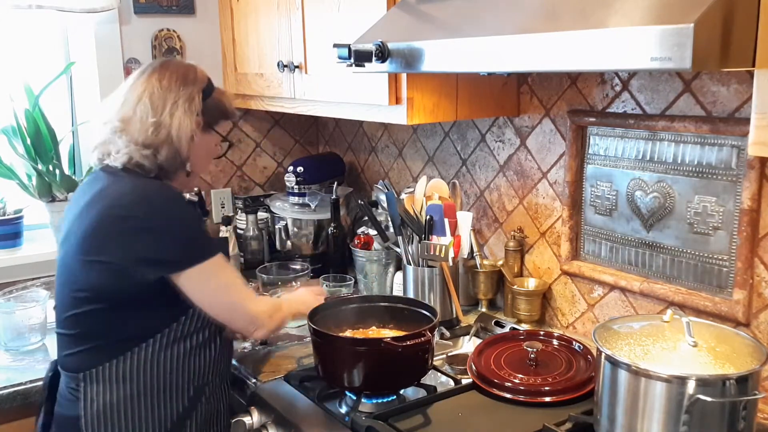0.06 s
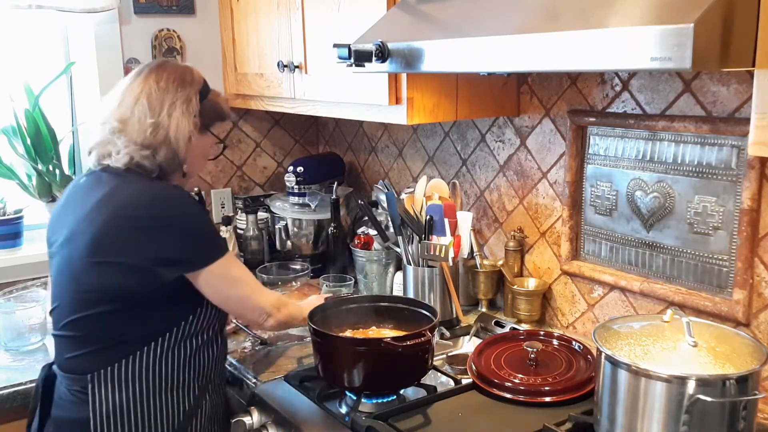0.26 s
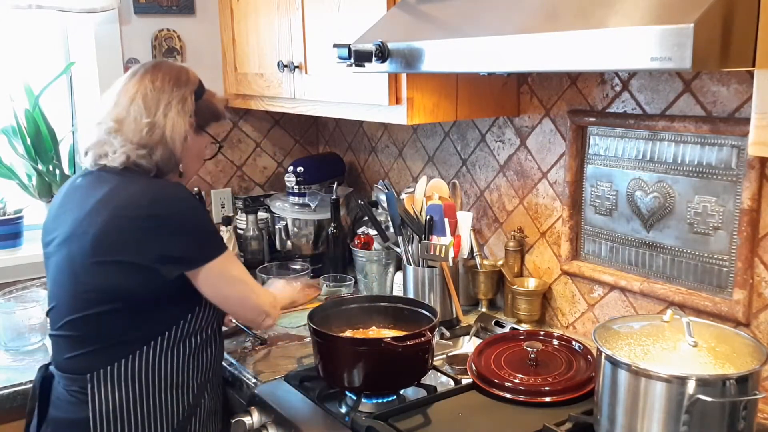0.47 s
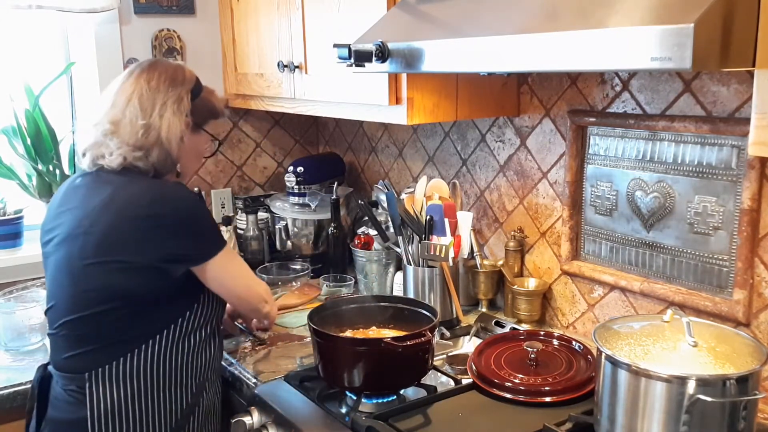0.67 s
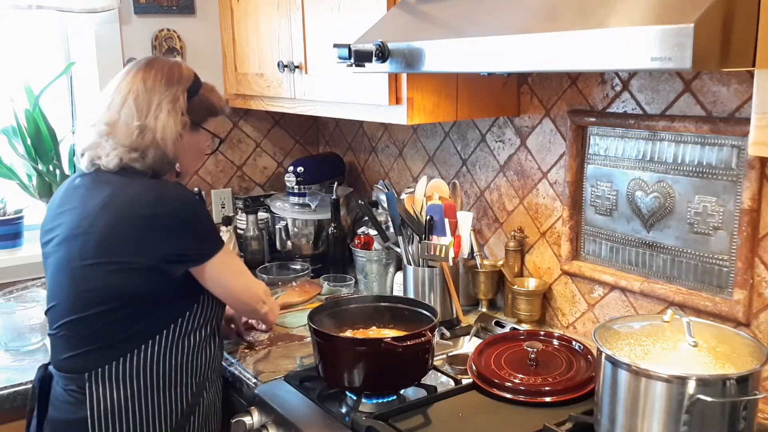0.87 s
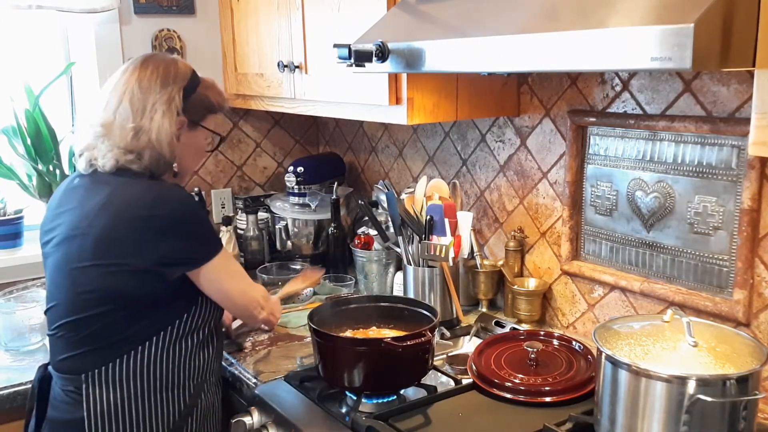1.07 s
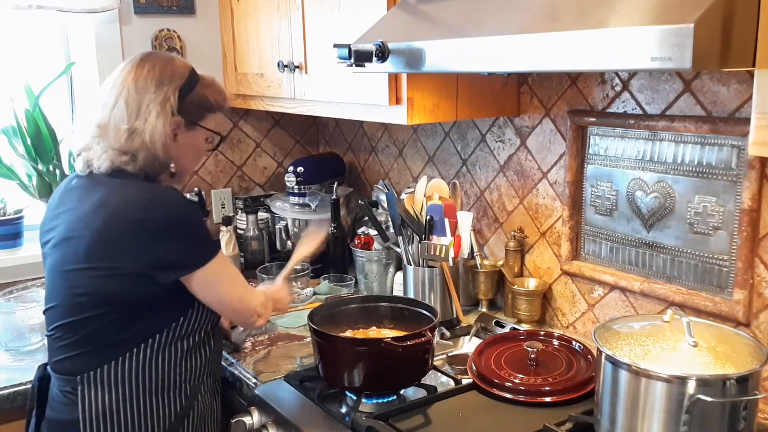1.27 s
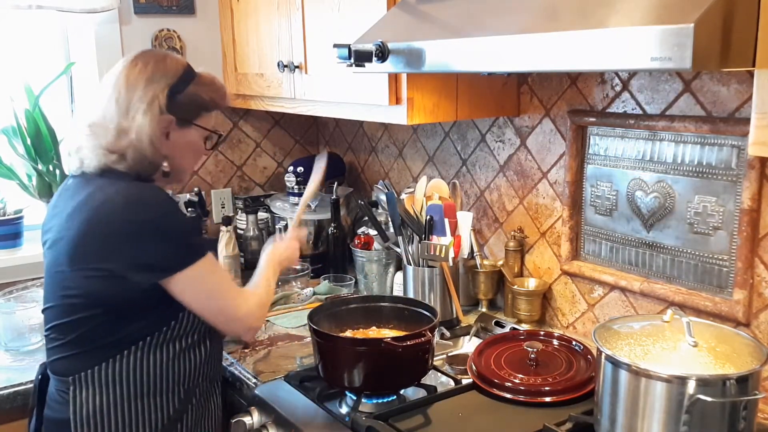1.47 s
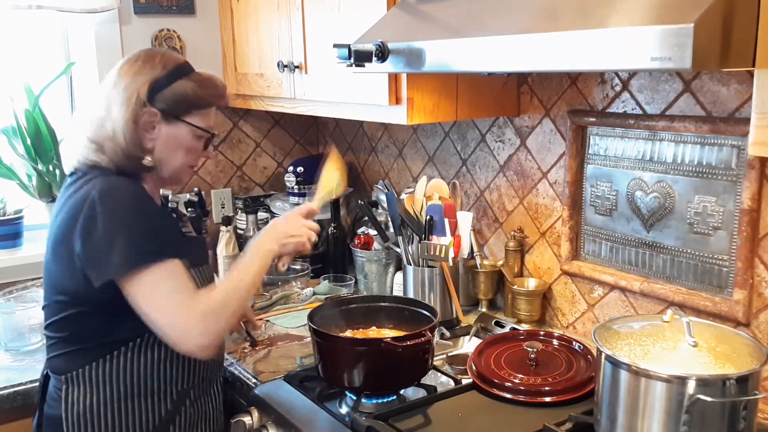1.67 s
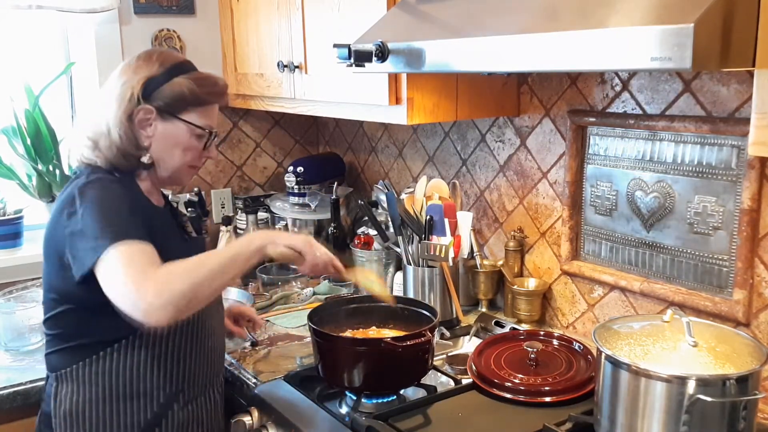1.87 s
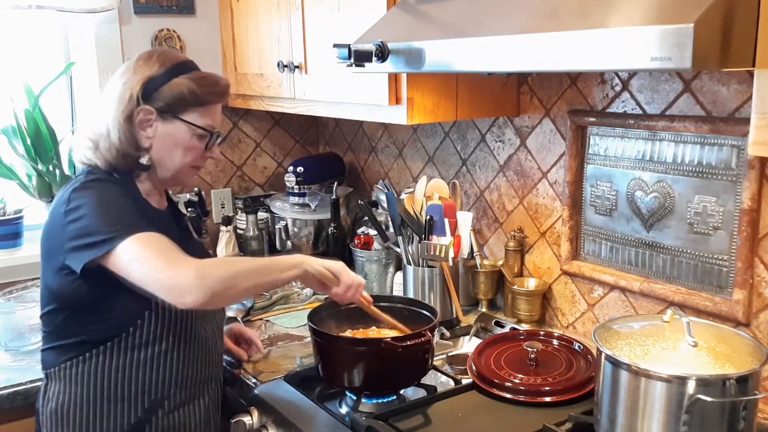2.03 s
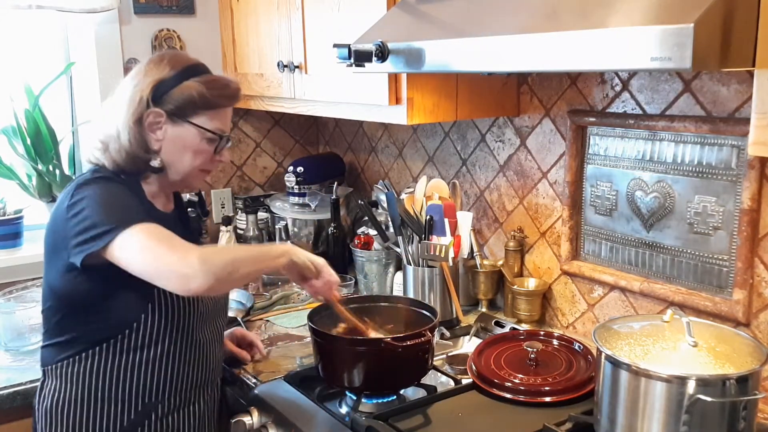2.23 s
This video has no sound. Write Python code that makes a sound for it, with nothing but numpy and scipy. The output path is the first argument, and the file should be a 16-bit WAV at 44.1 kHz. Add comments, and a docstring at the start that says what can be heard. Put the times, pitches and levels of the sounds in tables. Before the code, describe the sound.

Wooden spoon knocking down, rasping three times and bumping in a pot of simmering sauce.

```python
"""A wooden spoon is knocked down beside a pot of sauce, bounces, and scrapes three times on a hard surface,
sticking and slipping so that it rasps and squeaks. Then it dips into the cast-iron pot and bumps about,
muffled by the sauce. The simmering sauce spits faintly. A tiled kitchen echoes around it all,
over the hum of the mains and the hiss of the stove."""
import sys
import numpy as np
from scipy import signal
from scipy.fft import rfft, irfft
from scipy.io import wavfile
from scipy.ndimage import uniform_filter1d

SR = 44100
rng = np.random.default_rng(int(sys.argv[2]) if len(sys.argv) > 2 else 0)


def wav_record(signal):
    """Record a signal, one row per channel, as 16-bit PCM in the file named by sys.argv[1]."""
    frames = np.transpose(np.atleast_2d(signal))
    bounded = np.clip(frames, -1, 1)
    # unit amplitude maps onto the largest positive 16-bit level
    quanta = np.round(bounded * 32767).astype(np.int16)
    wavfile.write(sys.argv[1], SR, quanta)


N = 101429

# Levels in the tables are relative. A fade time (T60) is how long a sound takes to drop by 60 dB.
# The spoon lands, chatters and bounces. Each row: start in seconds, level in dB, treble boost in dB.
KNOCK_HITS = [(0.2021, -0.5, 3.5), (0.2128, 0, -4), (0.2193, -3, -1.5), (0.2250, -2.5, -0.5),
              (0.2440, -5, -5), (0.3000, -14.5, 3), (0.324, -6, 4), (0.3289, -8.5, -1), (0.3405, -11, -10)]
# The tone of each hit. Each row: frequency in Hz, level in dB.
KNOCK_TONE = [(50, -24), (120, -9.5), (180, -13.5), (270, -12), (400, -11.5), (650, -1.5), (1100, -7),
              (1600, 0.5), (2100, 3), (2700, -3.5), (3200, -7.5), (4000, -5.5), (5400, -15.5), (7000, -26),
              (8000, -41), (15000, -41.5)]
# The struck surface rings. Each row: pitch in Hz, level in dB, fade time in seconds.
SURFACE_NOTES = [(281, -12, .3), (585, -8, .33), (846, -10, .25), (1345, -4, .32), (1698, -5, .35),
                 (2002, -2, .36), (2063, -8, .35), (2096, -7, .3), (2360, -5, .35), (2405, -5, .36),
                 (2862, -5, .38), (2911, -3, .42), (3525, -11, .34), (3624, -10, .36)]
# The worktop thuds. Each row: pitch in Hz, level in dB, fade time in seconds.
THUD_NOTES = [(78.2, -5.5, .25), (110.4, -7, 0.2), (171.5, -0.5, 0.28)]
KNOCK_DB, CLATTER_DB, CLATTER_T60_S, CRACK_T60_S = -7.5, -1, 0.038, 0.0045
RING_DB, THUD_DB, RING_BUILD_S = -3, -19, .01

# Three scrapes, one list each. Each row: time in seconds, rubbing level in dB, treble in dB, ring in dB.
STROKES = [
    [(0.675, -19, -20, 14), (0.698, -2.5, -9, 5), (0.748, -0.5, -11, 4), (0.765, 3, 10, 3.5),
     (0.805, 3, -16, 1), (0.835, -7.5, -9, 1), (0.87, -14, -31, -12), (0.96, -21.5, 3, 11)],
    [(0.971, -3, -13, -12), (0.975, -2.5, 5, 0), (1.003, -5.5, -2.5, -4), (1.025, -5, -8, 6),
     (1.044, -5, -21, -8), (1.066, -8.5, -2, 0), (1.075, 2, 8, 1), (1.089, -8, -1, -10), (1.096, 9, 5, 6.5),
     (1.118, -12, -26, -24), (1.16, -16, -17, 15)],
    [(1.29, -13, -1, -10), (1.322, -5, -5.5, 4), (1.342, -3, 5.5, -1), (1.455, -1.5, 6, 7),
     (1.48, 2.5, 6.5, 4), (1.54, -1.5, 4.5, 12.5), (1.575, 1.5, 1, 6.5), (1.635, -1.5, 3.5, 7),
     (1.655, -22, -17, 1), (1.72, -20, -12, -11)],
]
# The tone of the rasp, one list per scrape. Each row: frequency in Hz, level in dB.
STROKE_TONES = [
    [(71, -22), (120, -21.5), (288, -14), (390, -23.5), (719, -13.5), (1380, -8), (1530, -5.5),
     (1690, -8.5), (2110, -7.5), (4130, -14.5), (4960, -8), (8420, -17.5), (15500, -22.5)],
    [(71, -50), (120, -15), (288, -10.5), (407, -14), (1560, 0), (1720, 0), (2810, -1.5), (3890, -7),
     (4960, -2.5), (7610, -6), (8590, -21.5), (9320, -12), (15500, -17)],
    [(120, -18.5), (400, -23.5), (700, -15.5), (1100, -4.5), (1600, 0.5), (2200, -2), (2600, -4),
     (3900, -9), (4700, -5.5), (6900, -7), (8000, -16.5), (8700, -22), (10700, -18), (15500, -26)],
]
# Notes that the rubbing sets ringing. Each row: pitch in Hz, width in Hz, level in dB.
SCRAPE_RESONANCES = [(620, 70, -15), (1150, 40, -11), (1515, 35, -6), (1556, 28, 2), (1615, 35, -7),
                     (2035, 55, -8), (2145, 45, -4), (2230, 45, -9), (2900, 140, -12)]
# A thin squeak lingers from the first scrape into the second. Each row: time in seconds, level in dB.
SQUEAK_LEVELS = [(0.74, -42), (0.79, -5), (0.87, -24.5), (0.915, -15.5), (0.96, -33), (0.99, -8.5),
                 (1.05, -26), (1.072, -0.5), (1.1, -6.5), (1.13, -29), (1.18, -35)]
# The high notes of the squeak. Each row: pitch in Hz, width in Hz, level in dB.
SQUEAK_RESONANCES = [(4365, 70, -4), (4552, 45, 0), (4880, 110, -7), (5110, 90, -6)]
SCRAPE_DB, RESONANCE_DB, JUDDER_DB = -49.5, -11, 1.5
CLICKS_PER_S, CLICK_SPREAD_DB, TREBLE_HZ = 9000, 4, 3536

# The spoon bumps the pot.
# Each row: start in seconds, level in dB, seconds for the drag to drop 30 dB, brightness in dB.
POT_BUMPS = [(0.591, -12.5, 0.077, 3), (1.864, -3, 0.017, -46.5), (1.991, -6.5, .02, -13),
             (2.002, -3.5, 0.0074, -19), (2.098, 1.5, .02, 2), (2.14, -1, 0.0034, 4.5),
             (2.199, -7.5, 0.096, 4), (2.245, -2.5, 0.054, 10), (2.275, -4.5, 0.049, 9)]
# The low notes of the pot's body. Each row: pitch in Hz, width in Hz, level in dB.
POT_BODY = [(566, 100, -5.5), (645, 71, -1.5), (734, 140, -7.5)]
# The brighter notes of its wall. Each row: pitch in Hz, width in Hz, level in dB.
POT_WALL = [(1040, 64, 6), (1187, 56, 11), (1396, 750, 9.5), (2200, 170, -20.5), (2700, 120, -10.5),
            (4300, 1500, -25)]
BUMP_DB = -36.5

# The sauce spits. Each row: start in seconds, level in dB.
SPITS = [(0.0898, 2.5), (0.093, -7), (0.96, -2), (1.7605, -9.5), (1.814, -12.5), (1.822, -4), (1.823, -18)]
# The bright tone of a spit. Each row: frequency in Hz, level in dB.
SPIT_TONE = [(1000, -17.5), (5000, -11.5), (9000, -40), (11000, 3.5), (12300, 8.5), (13500, 0.5),
             (16000, -1.5)]
SPIT_DB, SPIT_T60_S, SPIT_ROOM_DB = -34.5, 0.0088, -12.5

# The stove's rumble and hiss. Each row: frequency in Hz, level in dB.
STOVE_TONE = [(20, -34.5), (35, -19), (60, -7.5), (90, -10.5), (170, -9.5), (240, -19), (300, -12),
              (450, -24), (600, -7.5), (800, -29), (1000, -24), (1600, -27), (2600, -32.5), (4000, -29),
              (5000, -25), (6500, -33.5), (7800, -34), (8800, -56), (10500, -34.5), (12300, -31.5),
              (15500, -30.5)]
# The mains and a fan hum. Each row: pitch in Hz, level in dB.
HUM_NOTES = [(60, -65.5), (120, -81), (175, -81.5), (291, -83)]
STOVE_DB, STOVE_WIDE_HZ, HUM_WAVER_DB = -69, 406, -3

# How long the kitchen echoes. Each row: frequency in Hz, fade time in seconds.
ROOM_FADES = [(150, .36), (600, .33), (2000, .34), (5000, .35), (12000, .34)]
ROOM_DB, ROOM_BUILD_S, ROOM_WIDE_HZ = 7, 0.0012, 720
ECHO_SPREAD_DB, ECHO_THICKEN_S = 3, 0.58
RIGHT_DELAY_S, PAN_DB, TOP_HZ = 3 / SR, -2.4, 15850


def spoon_knock():
    """Each time the spoon hits, it makes a sharp crack and a short woody clatter."""
    wood, out = tone_filter(KNOCK_TONE), np.zeros(N)
    for start, db, treble_db in KNOCK_HITS:
        push = puff(CRACK_T60_S) + undb(CLATTER_DB) * puff(CLATTER_T60_S)
        add(out, start, undb(db) * treble(convolve(push, wood), treble_db))
    return undb(KNOCK_DB) * out


def surface_ring():
    """The first hit leaves the surface ringing after the clatter, over a soft thud."""
    t, out = np.arange(N) / SR, np.zeros(N)
    ring = undb(RING_DB) * ringing_notes(SURFACE_NOTES) + undb(THUD_DB) * ringing_notes(THUD_NOTES)
    add(out, KNOCK_HITS[0][0], ring * (1 - np.exp(-t / RING_BUILD_S)))
    return out


def spoon_scrapes():
    """Rubbing makes a rasp, a ring and a thin squeak. Pressing harder makes them louder."""
    t, ring = np.arange(N) / SR, resonances(SCRAPE_RESONANCES)
    judder = undb(JUDDER_DB * wander(120))
    squeak_rub = stick_slip() * pressure(t, *np.array(SQUEAK_LEVELS).T)
    out = convolve(squeak_rub, resonances(SQUEAK_RESONANCES))
    for stroke, tone in zip(STROKES, STROKE_TONES):
        times, db, treble_db, ring_db = np.array(stroke).T
        rasp = convolve(stick_slip() * judder * pressure(t, times, db), tone_filter(tone))
        out += treble(rasp, np.interp(t, times, treble_db))
        ring_rub = stick_slip() * judder * pressure(t, times, db + ring_db + RESONANCE_DB)
        out += convolve(ring_rub, ring)
    return undb(SCRAPE_DB) * out


def stick_slip():
    """Sliding wood catches and lets go, making a stream of tiny, uneven clicks."""
    clicks = (rng.random(N) < CLICKS_PER_S / SR) * rng.choice([-1, 1], N)
    return unit(clicks * undb(CLICK_SPREAD_DB * rng.standard_normal(N)))


def pressure(t, times, db):
    """How hard the spoon presses: it glides between the levels and is zero before and after."""
    return undb(np.interp(t, times, db)) * (t > times[0]) * (t < times[-1])


def pot_bumps():
    """The spoon drags briefly on the iron, and the sauce cuts the ring short."""
    body, wall, out = resonances(POT_BODY), resonances(POT_WALL), np.zeros(N)
    for start, db, drag_s, bright_db in POT_BUMPS:
        drag = rng.standard_normal(N) * fade(2 * drag_s)
        pot = body + undb(bright_db) * wall
        add(out, start, undb(db) * unit_energy(convolve(drag, pot)))
    return undb(BUMP_DB) * out


def sauce_spits():
    """The simmering sauce spits in tiny bright ticks."""
    out = np.zeros(N)
    for start, db in SPITS:
        add(out, start, undb(db) * puff(SPIT_T60_S))
    return undb(SPIT_DB) * convolve(out, tone_filter(SPIT_TONE))


def stove_and_hum():
    """The stove hisses and rumbles steadily, while the hum of mains and fan wavers."""
    t, tone, hum = np.arange(N) / SR, tone_filter(STOVE_TONE), np.zeros(N)
    mid, side = (convolve(rng.standard_normal(N), tone) for _ in range(2))
    for hz, db in HUM_NOTES:
        level = undb(db + HUM_WAVER_DB * wander(6.1))
        hum += level * np.sqrt(2) * np.sin(2 * np.pi * (hz * t + rng.random()))
    return undb(STOVE_DB) * widen(mid, side, STOVE_WIDE_HZ) + hum


def kitchen_echo():
    """Sound bounces off the tiles in echoes that thicken and die away."""
    t, f = np.arange(N) / SR, np.fft.rfftfreq(N, 1 / SR)
    hz, fade_times = np.array(ROOM_FADES).T
    noise, out = rng.standard_normal(N), np.zeros(N)
    unevenness = undb(ECHO_SPREAD_DB * fade(ECHO_THICKEN_S) * rng.standard_normal(N))
    spectrum = rfft(noise * unevenness)
    for share, t60 in zip(np.eye(len(hz)), fade_times):
        band = irfft(spectrum * np.interp(np.log(f + 1), np.log(hz), share), N)
        out += band * fade(t60)
    return unit_energy(out * (1 - np.exp(-t / ROOM_BUILD_S)))


def undb(db):
    """Turn decibels into a number to multiply by."""
    return 10 ** (np.asarray(db) / 20)


def unit(x):
    """Scale x to an average power of 1."""
    return x / np.sqrt(np.mean(x ** 2))


def unit_energy(x):
    """Scale x to a total energy of 1."""
    return x / np.sqrt(np.sum(x ** 2))


def fade(t60):
    """A curve that drops by 60 dB every t60 seconds."""
    return np.exp(-np.log(1000) * np.arange(N) / SR / max(t60, 1e-4))


def puff(t60):
    """A puff of noise that dies away."""
    return unit_energy(rng.standard_normal(N) * fade(t60))


def wander(rate):
    """A smooth random drift that turns about rate times a second."""
    step = int(SR / rate)
    stairs = np.repeat(rng.standard_normal(N // step + 1), step)
    return unit(uniform_filter1d(stairs, step)[:N])


def add(out, start, x):
    """Mix x into out, beginning at start seconds."""
    i = int(start * SR)
    out[i:] += x[:N - i]


def convolve(x, response):
    """Play x through an object or room, given its response to one click."""
    return signal.fftconvolve(x, response)[:N]


def tone_filter(points, size=4096):
    """A click shaped to the tone given by rows of frequency and level."""
    hz, db = np.array(points, float).T
    gain = undb(np.interp(np.log(np.fft.rfftfreq(size, 1 / SR) + 1), np.log(hz), db))
    # These steps make the sound start at the click, never before it.
    cepstrum = irfft(np.log(gain))
    cepstrum[1:size // 2] *= 2
    cepstrum[size // 2 + 1:] = 0
    return unit_energy(irfft(np.exp(rfft(cepstrum))))


def ringing_notes(rows):
    """A struck object rings with several pure notes, each fading at its own speed."""
    t = np.arange(N) / SR
    return unit_energy(sum((-1) ** k * undb(db) * fade(t60) * np.sin(2 * np.pi * hz * t)
                           for k, (hz, db, t60) in enumerate(rows)))


def resonances(rows):
    """Ringing notes given by their width: a wider one fades sooner."""
    return ringing_notes([(hz, db + 10 * np.log10(width), np.log(1000) / np.pi / width)
                          for hz, width, db in rows])


def treble(x, db):
    """Turn the treble up or down by db."""
    low = signal.sosfilt(signal.butter(1, TREBLE_HZ, fs=SR, output="sos"), x)
    return low + undb(db) * (x - low)


def widen(mid, side, hz):
    """Mix two unrelated sounds into left and right: alike below hz, unrelated above."""
    f = np.fft.rfftfreq(N, 1 / SR)
    share = .5 * f ** 2 / (f ** 2 + hz ** 2)
    mid = irfft(rfft(mid) * np.sqrt(1 - share), N)
    side = irfft(rfft(side) * np.sqrt(share), N)
    return np.array([mid + side, mid - side])


def scene():
    """Spoon and sauce are heard directly and as echoes, over the stove; the right is a bit louder."""
    spoon, spits = spoon_knock() + spoon_scrapes() + pot_bumps(), sauce_spits()
    echoes = widen(kitchen_echo(), kitchen_echo(), ROOM_WIDE_HZ)
    into_room = spoon + undb(SPIT_ROOM_DB) * spits
    out = np.array([undb(ROOM_DB) * convolve(into_room, echo) for echo in echoes])
    direct = spoon + spits + surface_ring()
    add(out[0], 0, direct)
    add(out[1], RIGHT_DELAY_S, direct)
    balance = undb(np.array([[PAN_DB], [-PAN_DB]]) / 2)
    return (out + stove_and_hum()) * balance


def record(dry):
    """Cut off the very highest treble."""
    return signal.sosfilt(signal.ellip(10, .2, 70, TOP_HZ, fs=SR, output="sos"), dry)


dry = scene()
out = record(dry)
wav_record(out)
```